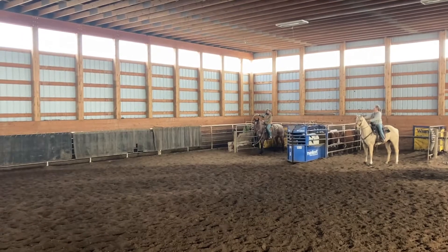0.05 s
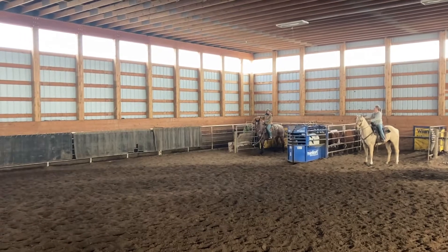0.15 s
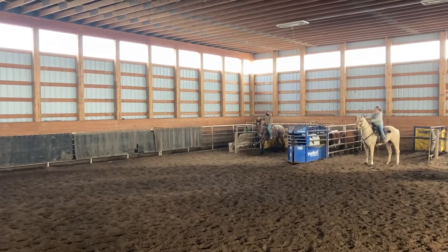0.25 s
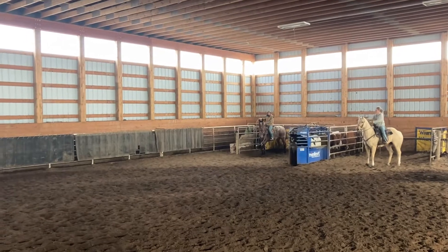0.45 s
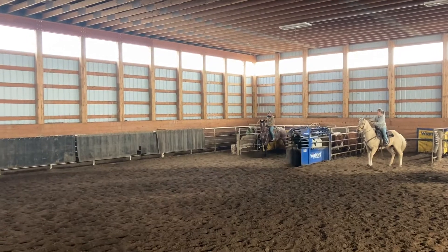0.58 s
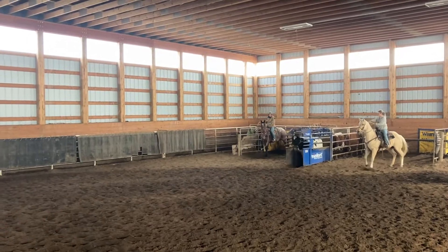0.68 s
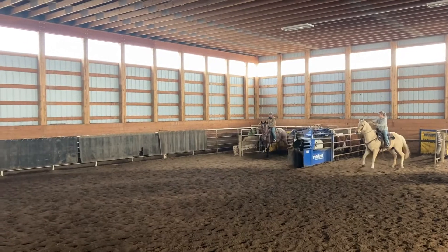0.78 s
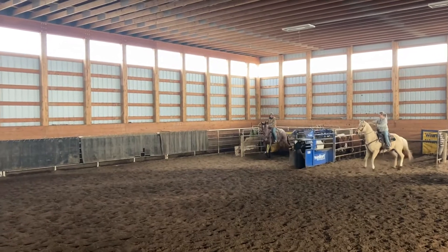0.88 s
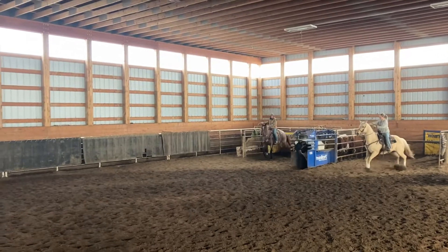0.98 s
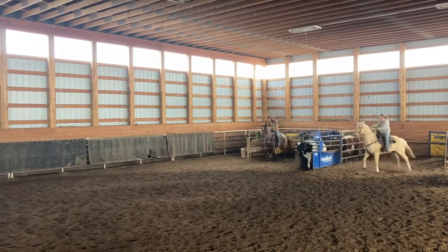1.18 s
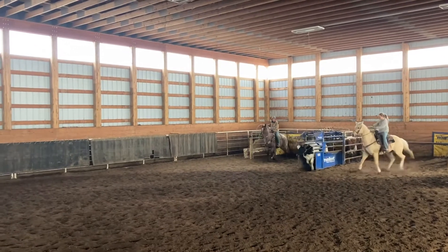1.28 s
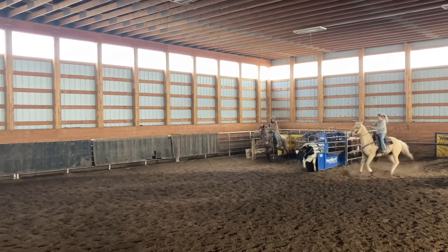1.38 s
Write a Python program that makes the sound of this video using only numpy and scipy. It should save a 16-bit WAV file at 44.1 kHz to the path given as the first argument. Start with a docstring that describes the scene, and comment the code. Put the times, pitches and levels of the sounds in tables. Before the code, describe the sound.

A steel cattle chute gate clanks and bangs open, echoing in a large indoor arena.

```python
"""A steel cattle chute opens at the far side of a large indoor riding arena, on a stereo microphone.
Its linkage clinks, the latch slams free, and the gate rattles open with a hinge squeak and bangs on
its stop. Each blow is one contact and a chatter of loose parts; the steel rings, the sheet sides boom.
Hooves thud on dirt, and loose steel jingles as the animals move off. From this distance the steel
reaches the microphone mostly as reflections, and the hall rings on over a low rumble."""
import sys
import numpy as np
from scipy import signal
from scipy.fft import rfft, irfft
from scipy.io import wavfile

SR = 44100
rng = np.random.default_rng(int(sys.argv[2]) if len(sys.argv) > 2 else 0)


def transcribe(signal):
    """Save signal, clipped to [-1, 1], as a 16-bit WAV file at the path in sys.argv[1]."""
    frames = np.atleast_2d(signal).T
    limited = np.clip(frames, -1, 1)
    pcm = np.round(limited * 32767).astype(np.int16)
    wavfile.write(sys.argv[1], SR, pcm)


N = 63945

# blows on linkage, latch and gate: start_s, level_db, tilt_db_per_octave, ring_db
LINKAGE_BLOWS = [(.096, -47, 10, 6), (.101, -42.5, 5, -4), (.126, -43.5, 5.5, -5), (.16, -52.5, -4, 11.5),
                 (.18, -55, 2, 10)]
LATCH_BLOWS = [(.2095, -23.5, 1.5, 1), (.2235, -21.5, 0, -7.5), (.243, -30, -5.5, 5), (.284, -28.5, -6, -2)]
GATE_BLOWS = [(.52, -36, -2, -3.5), (.542, -30.5, -1, 6.5), (.5975, -24, 1.5, -0.5), (.631, -25, 2, -6),
              (.651, -22, -0.5, 0.5), (.6595, -19.5, 2.5, -0.5), (.685, -29.5, -5.5, 5),
              (.703, -18.5, -1, 1), (.735, -25, -0.5, 5.5), (.776, -31.5, -10, -11), (.856, -35, -9, 8),
              (.936, -39, -1.5, 0), (1.141, -45, -1, 2), (1.3, -44.5, -1.5, 1)]
# knocks further back, hoof thuds and side panel booms: start_s, level_db, tilt_db_per_octave
FAR_KNOCKS = [(.004, -48.5, 3), (.02, -43, 1)]
HOOF_THUDS = [(.05, -49, -13), (.1, -55, -3), (.985, -25, -8), (1.02, -30.5, -4), (1.07, -29, -4),
              (1.178, -27, 4), (1.25, -26, 2.5), (1.36, -28.5, 3), (1.402, -31, -3.5), (1.428, -32.5, 1)]
PANEL_BOOMS = [(.24, -32, -1.5), (.275, -36.5, -5), (.312, -27.5, 9.5), (.355, -26.5, 9.5),
               (.413, -27.5, 4.5), (.49, -30.5, 0), (.555, -24.5, -3), (.63, -21, 2), (.68, -19, 2),
               (.722, -9.5, 3), (.754, -17.5, 3), (.792, -19, 2.5), (.848, -24.5, 7.5), (.892, -19, 0),
               (.915, -30, -5)]
# ringing modes of the steel parts: pitch_hz, level_db, t60_s
LINKAGE_RING = [(1180, -3, .15), (2050, 1, .16), (2600, -4, .12), (3550, -1, .25), (3950, -3, .15),
                (4750, -2, .12), (6690, -2, .18), (7150, -3, .14), (7760, -1, .2), (8300, -4, .14)]
LATCH_RING = [(167, 2.5, 1.0), (622, 8, .28), (764, -2, .38), (1138, -3, .5), (1215, -4, .5),
              (1814, -5, .45), (1870, -7, .4), (2040, -2, .4), (2162, -1, .4), (2683, -2, .45),
              (2790, -3, .35), (3028, -4, .35), (3488, -3, .35), (4016, -8, .4), (4215, -8, .4),
              (4673, -8, .3), (6148, -8, .45), (7768, -11, .3)]
GATE_RING = [(185, 1, .9), (289, -2, .7), (433, -3, .6), (604, -2, .5), (625, -4, .35), (660, -5, .35),
             (705, -1, .55), (758, -3, .45), (872, -9, .5), (969, -5, .5), (1029, -2, .5), (1127, -4, .5),
             (1212, -2, .6), (1351, -6, .4), (1602, -10, .6), (1756, -3, .5), (1981, -6, .46),
             (2080, -8, .55), (2220, -6, .5), (2256, -6, .45), (2374, -5, .55), (2546, -11, .5),
             (2670, -7, .35), (2789, -5.5, .5), (2877, -9, .4), (3074, -9, .4), (3140, -6, .3),
             (6132, -17, .35)]
# tone colour of each source: frequency_hz, level_db
RUMBLE_SPECTRUM = [(20, -25), (40, -12), (65, 2.5), (120, -3), (270, -3), (500, -16), (1100, -27),
                   (2000, -35), (5000, -45), (12000, -52)]
KNOCK_SPECTRUM = [(100, -18), (200, 0), (270, 16.5), (400, -12), (600, -34), (1000, -9), (1350, -10.5),
                  (1900, -36), (5000, -63)]
HOOF_SPECTRUM = [(25, -31), (50, -4), (75, -2), (125, 9), (175, 9), (230, -5.5), (400, -16.5), (700, -31.5),
                 (1500, -34.5), (4000, -62), (8000, -91), (12000, -118)]
CLINK_SPECTRUM = [(100, -10.5), (400, -2), (700, 21.5), (2000, 10.5), (3800, 5.5), (5400, 2.5), (7500, 3),
                  (9500, -2), (11500, -6.5), (13000, -6)]
LATCH_SPECTRUM = [(60, -18), (200, 6.5), (450, 0), (650, 9.5), (900, 5.5), (1250, 9), (1600, 3.5),
                  (2700, 5.5), (4500, -1), (6300, -1), (7400, -6.5), (10000, -5.5), (12000, -6),
                  (13000, -9.5)]
PANEL_SPECTRUM = [(25, -54), (50, -17), (75, 0.5), (115, 6), (180, 2), (225, -8), (300, -13), (450, -25),
                  (800, -53), (2000, -75), (10000, -94)]
GATE_SPECTRUM = [(60, -38), (200, 10.5), (300, 2.5), (420, 9.5), (520, 2.5), (650, 12.5), (860, 5),
                 (1150, 7), (1550, 1.5), (2400, -0.5), (4500, -5), (7000, -10.5), (8700, -12.5),
                 (10800, -14), (12000, -18.5), (13000, -27.5)]
# squeaks of the hinge: pitch_hz, level_db, peak_s, half_length_s
HINGE_SQUEAKS = [(6132, -30, .695, .012), (6132, -35, .709, .006), (11555, -39, .607, .006),
                 (11545, -44, .635, .02), (11535, -41, .705, .05)]
# swell of the jingling steel: time_s, level_db
JINGLE_SWELL = [(1.0, -83), (1.1, -70), (1.24, -63.5), (1.301, -65), (1.37, -59), (1.42, -53.5),
                (1.45, -48.5)]
# decay of the arena: frequency_hz, t60_s
ARENA_DECAY = [(60, 1.65), (150, 1.32), (400, 2.34), (1000, 1.16), (2500, 1.49), (5000, 0.86), (8000, 0.75),
               (12000, 0.47)]
# likeness of the microphone's two sides: frequency_hz, coherence (0 to 1)
MIC_COHERENCE = [(60, .96), (160, .97), (350, .85), (700, .6), (1400, .58), (2800, .2), (4400, .45),
                 (5700, .3), (7000, .88), (8000, .75), (9200, .9), (10500, .7), (11400, .92), (12500, .55)]
# balance at the microphone: frequency_hz, left_minus_right_db
MIC_BALANCE = [(80, -2.5), (180, -1.2), (700, -1.5), (1400, 3), (2800, 2), (5600, 0.6), (10000, -0.4)]
# phase by which the right microphone port leads: frequency_hz, lead_rad
MIC_PHASE = [(150, 0), (1000, .2), (2000, .7), (4300, .8), (5000, 1.4), (6300, 5.8), (7200, 6.4),
             (9200, 9.4), (11400, 12.5), (12400, 13.7)]

TIME_S = np.arange(N) / SR
FREQ_HZ = np.arange(N + 1) * SR / (2 * N)  # bins of a spectrum padded to 2 * N


def undb(db):
    """Decibels to gain."""
    return 10 ** (np.asarray(db) / 20)


def along(points, hz=FREQ_HZ):
    """Read (frequency_hz, value) points on a log-frequency axis."""
    point_hz, values = np.array(points, float).T
    return np.interp(np.log(hz + 1), np.log(point_hz), values)


def shape(x, gain):
    """Filter by a gain per frequency; a complex spectrum as the gain convolves the two sounds."""
    return irfft(rfft(x, 2 * N) * gain)[..., :N]


def unit(x):
    """Scale to a mean energy of 1 per channel."""
    return x / np.sqrt(np.mean(np.sum(x ** 2, axis=-1)) + 1e-18)


def wander(size, bandwidth_hz):
    """Smooth random motion with an RMS of 1."""
    return np.sqrt(N) * unit(shape(rng.standard_normal(size), np.exp(-(FREQ_HZ / bandwidth_hz) ** 2)))


def contacts(per_s):
    """Tiny impacts of random strength at random moments."""
    return rng.standard_normal(N) * (rng.random(N) < per_s / SR)


def diffuse():
    """Noise reaching the microphone from all around, alike on both sides in the bass."""
    coherence = np.clip(along(MIC_COHERENCE), 0, .995)
    mid, side = rng.standard_normal((2, N))
    mid = shape(mid, np.sqrt((1 + coherence) / 2))
    side = shape(side, np.sqrt((1 - coherence) / 2))
    return np.array([mid + side, mid - side])


def arena(early_db, early_s, build_s, direct_db=-19):
    """Path across the arena to the microphone: direct sound, near reflections, a long dull tail."""
    noise, tail = rfft(diffuse(), 2 * N), 0
    centres_hz = np.array([60, 150, 400, 1000, 2500, 4000, 5600, 7500, 9500, 12000])
    for hz, weights in zip(centres_hz, np.eye(len(centres_hz))):
        band = irfft(noise * along(list(zip(centres_hz, weights))))[:, :N]
        tail += band * undb(-60 * TIME_S / along(ARENA_DECAY, hz))
    build = 1 - np.exp(-TIME_S / build_s)
    early_lift = 1 + undb(early_db) * np.exp(-TIME_S / early_s)
    response = unit(tail * build * early_lift)
    response[:, 0] += undb(direct_db)
    return unit(response)


def strikes(blows, colour, pivot_hz, chatter_db, chatter_s, chatter_per_s):
    """Spectrum of a run of blows; each is one contact followed by a dying chatter of loose parts."""
    octaves = np.log2(np.maximum(FREQ_HZ, 50) / pivot_hz)
    spectrum = 0
    for start_s, level_db, tilt, *_ in blows:
        force = undb(chatter_db) * unit(contacts(chatter_per_s) * np.exp(-TIME_S / chatter_s))
        force[0] += 1  # the first contact
        blow = rfft(force, 2 * N) * undb(along(colour) + tilt * octaves)
        blow /= np.sqrt(np.mean(abs(blow) ** 2))
        delay = np.exp(-2j * np.pi * FREQ_HZ * start_s)
        spectrum += undb(level_db) * blow * delay
    return spectrum * np.sqrt(SR / 100)


def ringing(blows, modes, pivot_hz, level_db, build_s, waver_hz, waver_depth=.72, spread_db=2.5):
    """Modes of a steel part; each blow renews them in a new mix, the hall makes them swell and waver."""
    sound = 0
    for hz, mode_db, t60_s in modes:
        power = 0
        for start_s, blow_db, tilt, ring_db in blows:
            age_s = np.maximum(TIME_S - start_s, 0)
            tilt_db = tilt * np.log2(hz / pivot_hz) / 2
            strength = undb(blow_db + ring_db + tilt_db + spread_db * rng.standard_normal())
            envelope = (1 - np.exp(-age_s / build_s)) * undb(-60 * age_s / t60_s)
            power += (strength * envelope) ** 2
        slow = wander((3, 2, N), waver_hz) / np.sqrt(2)
        drift = slow[:, 0] + 1j * slow[:, 1]  # rows: shared, left, right
        coherence = np.clip(along(MIC_COHERENCE, hz), 0, 1)
        stereo_drift = np.sqrt(coherence) * drift[0] + np.sqrt(1 - coherence) * drift[1:]
        waver = (1 + waver_depth * stereo_drift) / np.hypot(1, waver_depth)
        tone = np.exp(2j * np.pi * (hz * TIME_S + rng.random()))
        sound += undb(mode_db) * np.sqrt(power) * np.real(waver * tone)
    return undb(level_db) * sound


def rumble(level_db=-53.5):
    """Room tone: the quiet air of the hall, all around the microphone."""
    return undb(level_db) * np.sqrt(N) * unit(shape(diffuse(), undb(along(RUMBLE_SPECTRUM))))


def knocks():
    """Faint hollow knocks from further back in the hall, before the gate moves."""
    path = arena(early_db=32, early_s=.015, build_s=.0033)
    return shape(path, strikes(FAR_KNOCKS, KNOCK_SPECTRUM, pivot_hz=400,
                               chatter_db=-12, chatter_s=.067, chatter_per_s=390))


def hooves():
    """Hooves land on soft dirt with dull thuds."""
    path = arena(early_db=16, early_s=.014, build_s=.0024, direct_db=-2)
    return shape(path, strikes(HOOF_THUDS, HOOF_SPECTRUM, pivot_hz=140,
                               chatter_db=-3.5, chatter_s=.028, chatter_per_s=800))


def linkage():
    """The loose steel linkage gives small bright clinks, each with a brief ring."""
    path = arena(early_db=0, early_s=.015, build_s=.00051)
    ticks = shape(path, strikes(LINKAGE_BLOWS, CLINK_SPECTRUM, pivot_hz=4000,
                                chatter_db=0, chatter_s=.014, chatter_per_s=710))
    return ticks + ringing(LINKAGE_BLOWS, LINKAGE_RING, pivot_hz=4400,
                           level_db=-15, build_s=.0044, waver_hz=36)


def latch(spots=3):
    """The latch slams free and rings; its blows land at several spots, each with its own reflections."""
    crack = 0
    for spot in range(spots):
        path = arena(early_db=.36, early_s=.032, build_s=.002)
        crack += shape(path, strikes(LATCH_BLOWS[spot::spots], LATCH_SPECTRUM, pivot_hz=2000,
                                     chatter_db=-4, chatter_s=.012, chatter_per_s=500))
    return crack + ringing(LATCH_BLOWS, LATCH_RING, pivot_hz=1300,
                           level_db=-14, build_s=.019, waver_hz=32)


def panels(sheets=3):
    """The sheet sides of the chute boom as the frame is shaken, each with its own reflections."""
    boom = 0
    for sheet in range(sheets):
        path = arena(early_db=9, early_s=.02, build_s=.0026, direct_db=1)
        boom += shape(path, strikes(PANEL_BOOMS[sheet::sheets], PANEL_SPECTRUM, pivot_hz=140,
                                    chatter_db=-11.5, chatter_s=.06, chatter_per_s=400))
    return boom


def gate(spots=3):
    """The barred gate rattles open and hits its stop, striking the frame at several spots."""
    clatter = 0
    for spot in range(spots):
        path = arena(early_db=1.1, early_s=.029, build_s=.00024)
        clatter += shape(path, strikes(GATE_BLOWS[spot::spots], GATE_SPECTRUM, pivot_hz=1500,
                                       chatter_db=-5, chatter_s=.0098, chatter_per_s=660))
    return clatter + ringing(GATE_BLOWS, GATE_RING, pivot_hz=1040,
                             level_db=-17, build_s=.0069, waver_hz=26.5)


def hinge(wobble_rms_hz=75, arena_db=-2.5):
    """Steel rubs on steel in short, thin squeaks whose pitch wobbles quickly and at random."""
    wobble_hz = wobble_rms_hz * wander(N, bandwidth_hz=260)
    squeaks = 0
    for hz, level_db, peak_s, half_length_s in HINGE_SQUEAKS:
        envelope = undb(level_db) * np.exp(-((TIME_S - peak_s) / half_length_s) ** 2)
        squeaks += envelope * np.sin(2 * np.pi * np.cumsum(hz + wobble_hz) / SR)
    path = arena(early_db=6, early_s=.022, build_s=.0027)
    return squeaks + undb(arena_db) * shape(path, rfft(squeaks, 2 * N))


def jingle():
    """Loose steel as the animals move off: a swelling patter of tiny contacts, blurred by the hall."""
    patter = np.sqrt(N) * unit(shape(contacts(per_s=1500), undb(along(CLINK_SPECTRUM))))
    swell = undb(np.interp(TIME_S, *np.array(JINGLE_SWELL).T, left=-120))
    path = arena(early_db=36, early_s=.0065, build_s=.002)
    return shape(path, rfft(patter * swell, 2 * N))


def scene():
    """All sources meet at the microphone, arriving a little earlier on the right."""
    sound = linkage() + jingle() + latch() + gate() + hinge() + panels() + hooves() + knocks() + rumble()
    left_gain = undb(along(MIC_BALANCE) / 2) * np.exp(-.5j * along(MIC_PHASE))
    mirrored = np.hstack([sound, sound[:, ::-1]])  # keeps the ends free of clicks
    return irfft(rfft(mirrored) * np.array([left_gain, 1 / left_gain]))[:, :N]


def record(dry):
    """The recorder cuts the top; the sound ends on a very short fade."""
    top_hz, fade_s = 12700, .004
    lowpass = signal.ellip(8, .2, 70, top_hz, fs=SR, output="sos")
    fade = np.minimum(TIME_S[::-1] / fade_s, 1)
    return fade * signal.sosfilt(lowpass, dry)


dry = scene()
out = record(dry)
transcribe(out)
```